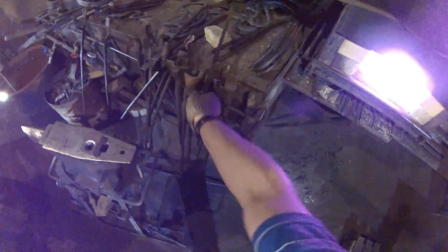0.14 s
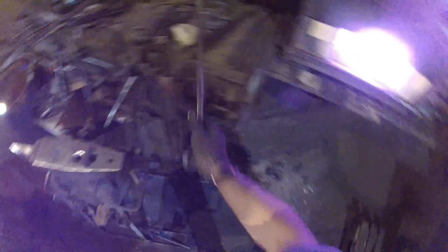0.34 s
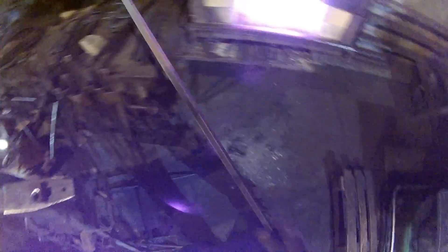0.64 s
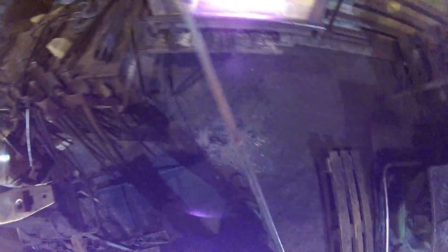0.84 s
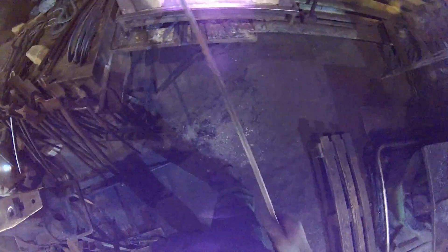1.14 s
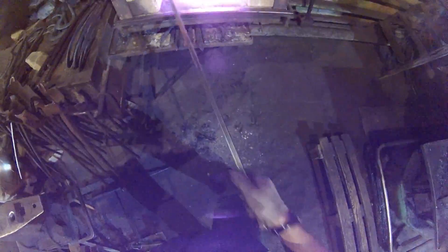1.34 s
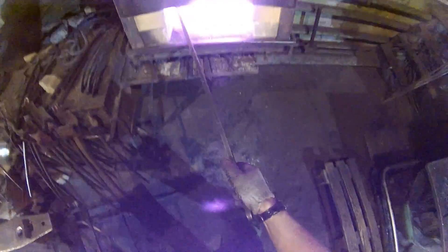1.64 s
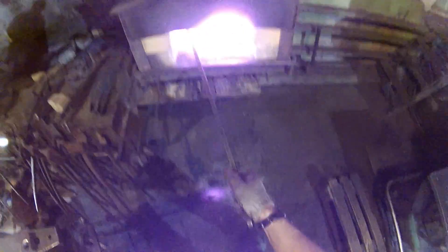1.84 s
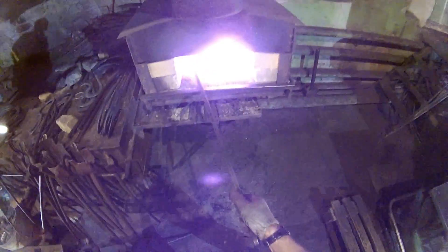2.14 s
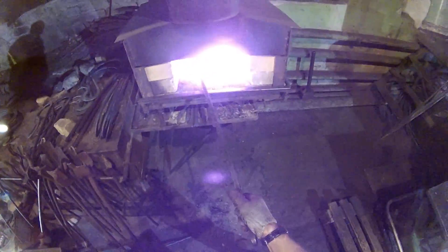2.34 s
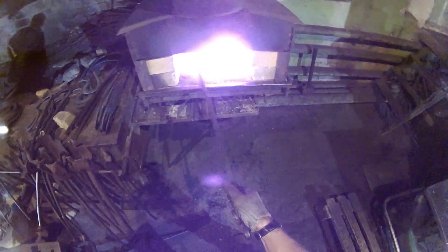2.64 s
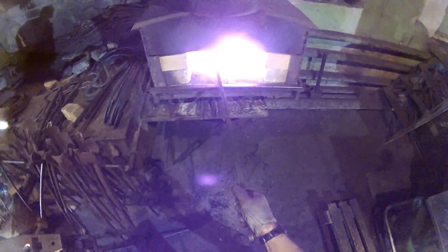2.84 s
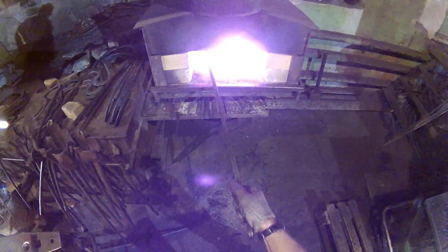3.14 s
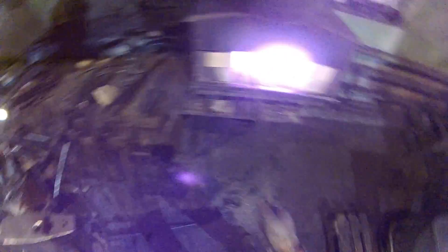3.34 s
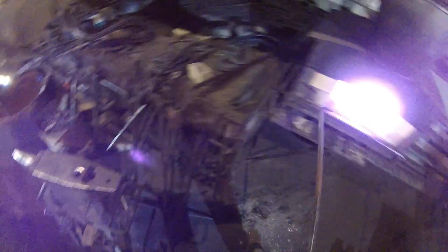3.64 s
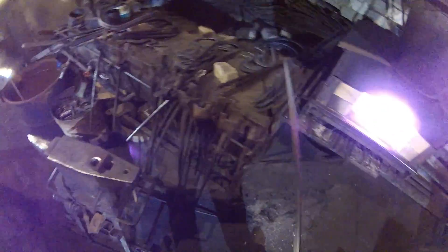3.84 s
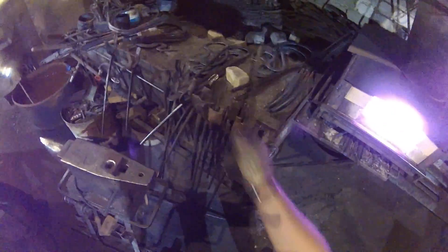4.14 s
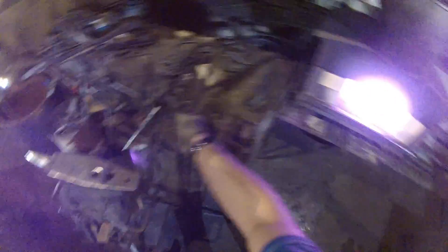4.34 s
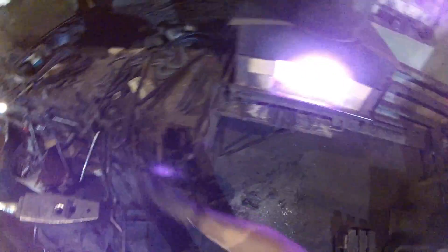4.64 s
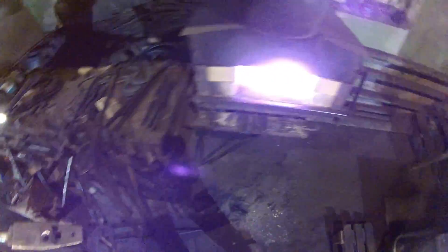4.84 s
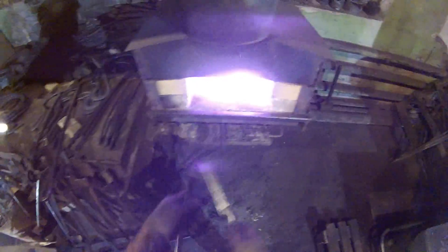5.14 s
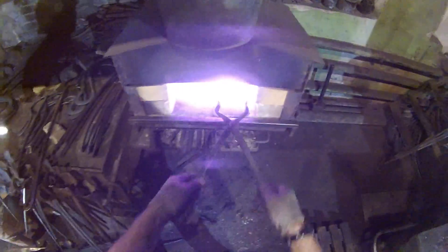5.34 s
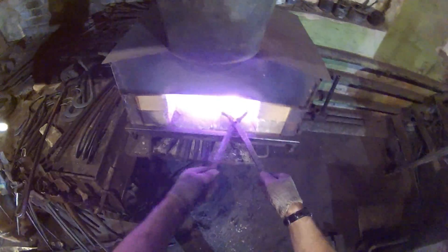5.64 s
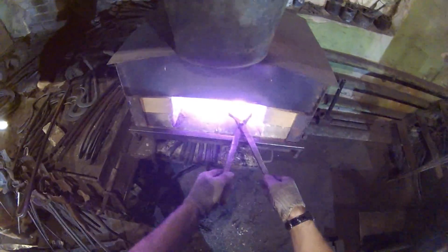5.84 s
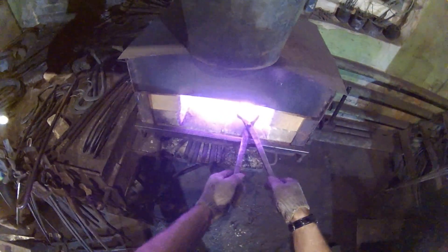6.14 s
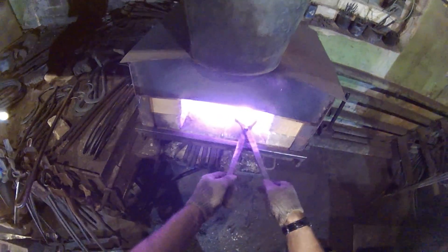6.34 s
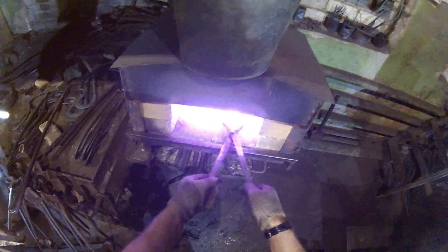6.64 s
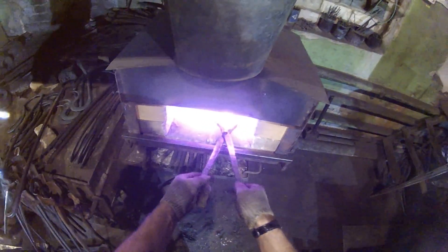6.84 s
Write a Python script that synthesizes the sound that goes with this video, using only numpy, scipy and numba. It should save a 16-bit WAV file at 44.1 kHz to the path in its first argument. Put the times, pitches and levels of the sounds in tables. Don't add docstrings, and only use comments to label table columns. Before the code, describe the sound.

Wide, airy burner hiss shifts as the wearer turns; steel nudges lightly, tongs scrape at four seconds, then soft knocks and clinks follow.

```python
import sys
import numpy as np
from scipy import signal
from scipy.fft import rfft, irfft
from scipy.io import wavfile
from scipy.ndimage import uniform_filter1d
from numba import njit

SR = 44100
rng = np.random.default_rng(int(sys.argv[2]) if len(sys.argv) > 2 else 0)


def how_loud(loudness_db):
    steps = np.asarray(loudness_db, float) / 20
    return 10 ** steps


def transcribe(u):
    v = np.clip(np.atleast_2d(u).T, -1, 1)
    q = np.round(v * 32767).astype(np.int16)
    wavfile.write(sys.argv[1], SR, q)


N = 309141
TIME = np.arange(N) / SR
FREQ = np.arange(N // 2 + 1) * SR / N + 1e-9

# [t/s, nearness/dB, facing the mouth/dB]
WEARER_MOVES = [(0, -1, -1.5), (.4, 0, -1.5), (.9, 1.5, 5), (1.35, 0, -1.5), (1.65, -2.5, -3),
                (1.9, -1.5, 1.5), (2.35, 0, 5.5), (2.9, -1, 4), (3.4, -2, 2.5), (3.85, -2, -3.5),
                (4.35, 1.5, -3), (4.6, -0.5, 0.5), (5.1, 0, 0), (5.4, 3.5, -0.5), (5.62, 2.5, 4.5),
                (5.88, 2.5, -1.5), (6.4, 0, 0), (7.01, 1, -0.5)]
# [f/Hz, share of nearness, share of facing]
HISS_SHARES = [(134, 0.24, 0), (1300, 0.77, -0.085), (1600, 0.55, -0.34), (1900, 0.48, -0.077),
               (2500, .3, 0.047), (3030, .1, 0.62), (3490, 0.28, -0.14), (4100, 0.48, 0.21),
               (4840, 0.74, -0.21), (7000, .1, 0.26), (11000, 0.55, -.15)]
# [t/s, f/Hz, level/dB]
TUBE_SONG = [(0, 3900, -17), (.5, 4200, 0), (1.5, 4080, 2.5), (2.5, 4030, -0.5), (3.5, 4210, 1.5),
             (4.5, 4110, 3), (5.2, 4066, 2), (5.8, 4060, 9.5), (6.15, 4100, 6.5), (6.45, 4160, 11),
             (7.01, 4224, 11.5)]
# [start t/s, length/s, from f/Hz, to f/Hz, level/dB]
WHISTLE_GLIDES = [
    (0, 1, 10500, 8730, 7.5),
    (1.05, 1.42, 8650, 8950, 4),
    (3.1, 0.75, 8350, 8500, 3),
    (4.852, 1.2, 9950, 8900, 5),
    (5.95, .42, 8900, 9000, 3),
    (6.55, 0.48, 8450, 8350, 6),
]
# [start t/s, length/s, f at 0 s/Hz, level/dB]
SPURT_LINES = [
    (-.05, 0.26, 10200, 14),
    (-.05, 0.26, 10640, 14),
    (-.05, .12, 10760, 14),
    (.1, .16, 10830, 17),
    (.4, .18, 10620, 9),
]
# [t/s, length/s, level/dB]
INSECT_BURSTS = [
    (1.76, .05, 13),
    (5.665, .12, 12),
    (5.79, .07, 7),
    (5.98, .05, 7),
    (6.09, .05, 14),
    (6.19, .045, 15),
    (6.27, .04, 8),
    (6.97, .04, 8),
]
# [t/s, level/dB, length/s]
STEEL_NUDGES = [(1.171, 3, 0.0155), (1.198, -3, 0.0067), (1.279, 3, 0.016), (1.356, 5, 0.016),
                (1.376, -3, 0.014), (4.115, 1.5, .012), (4.133, 0, .006), (4.155, 2, 0.017),
                (4.176, 2, .004), (4.231, -3, .006), (4.24, 6, 0.0059), (4.267, 4, .003),
                (4.328, -5, 0.014)]
# [f/Hz, level/dB]
SCRAPE_COLOUR = [(1400, -20.5), (1900, -10), (2150, 3), (2450, -8), (2700, 6.5), (3030, 2), (3250, 5),
                 (3600, -4), (4100, -7.5), (4900, -2.5), (6300, -1), (6800, 1), (7600, -3), (8500, -35)]
# [t/s, level/dB, f/Hz, t60/s]
TOOL_TICKS = [
    (1.368, 15, 4230, 0.1),
    (5.02, 17, 1800, 0.14),
    (5.745, 11, 1870, 0.12),
    (5.73, 11, 6950, .25),
    (6.13, 12, 5400, 0.35),
    (6.162, 18.5, 4100, 0.091),
]
# [f/Hz, level/dB]
CASE_WALL = [(25, -110), (70, -107), (120, -96.5), (200, -88), (300, -87.5), (450, -87.5), (700, -92.5),
             (1050, -84), (1550, -78), (2100, -70.5), (2550, -74.5), (3300, -74.5), (4500, -78), (5100, -95),
             (5500, -93.5), (5850, -104), (6500, -109), (7600, -104), (8400, -102), (8900, -98.5),
             (9800, -91.5), (11000, -91), (12500, -90.5), (13000, -100.5), (13600, -104), (14500, -111),
             (15300, -100), (15700, -101)]
# [f/Hz, width/Hz, level/dB]
CASE_PEAKS_AND_DIPS = [(208, 19, 3.5), (297, 11.3, 8), (1285, 4.9, 3.5), (1294.6, 134, 14.5), (1396.5, 137, 10.5),
                       (1627, 130, 4.5), (1802, 94, 12), (1909, 158, 8), (2300, 100, 2.5), (3035, 175, 9.5),
                       (3578, 255, -11.5), (3812, 187, 6), (4080, 200, 5.5), (5230, 93, 3), (7060, 190, -3.5),
                       (9580, 220, -7.5), (10000, 300, 0.5), (15050, 260, 5),
                       (6040, 190, -35), (7995, 80, -18), (8030, 450, -12)]


def on_log(table):
    hz, db = np.transpose(table)
    return np.interp(np.log(FREQ), np.log(hz), db)


def shaped(x, gain):
    return irfft(rfft(x) * gain, N)


@njit
def svf(x, hz, width):
    y, band, low = np.empty(len(x)), 0., 0.
    for i in range(len(x)):
        g = np.tan(np.pi * hz[i] / SR)
        damping = width[i] / hz[i]
        v = (band + g * (x[i] - low)) / (1 + g * (g + damping))
        band = 2 * v - band
        low = low + 2 * g * v
        y[i] = damping * v
    return y


def resonance(x, hz, width):
    return svf(x, np.zeros(N) + hz, np.full(N, 1. * width))


def walk(rate):
    hold = int(SR / rate)
    levels = np.repeat(rng.standard_normal(N // hold + 1), hold)
    return 0.96 * uniform_filter1d(uniform_filter1d(levels, hold), hold)[:N]


def gate(s, span, edge):
    return np.clip(np.minimum(TIME - s, s + span - TIME) / edge, 0, 1)


def burner(swell_db=1.16, flicker_db=0.38, treble_flicker_db=2.5, drift_db=0.8):
    s, *moves = np.transpose(WEARER_MOVES)
    turn = np.array([np.interp(TIME, s, db) for db in moves])
    part_hz, *shares = np.transpose(HISS_SHARES)
    noise = rfft(rng.standard_normal(N))
    swell = swell_db * walk(6)
    gust = walk(24)
    low_hz = 134 * 2 ** (np.arange(9) / 3)
    middle_hz = 134 * 2 ** (np.arange(18, 30) / 6)
    centres = np.r_[low_hz, middle_hz, 4300:16000:580]
    position = np.interp(FREQ, centres, np.arange(len(centres)))
    out = 0
    for k, hz in enumerate(centres):
        share = [np.interp(np.log(hz), np.log(part_hz), row) for row in shares]
        if hz > 6000:
            flicker = treble_flicker_db * (0.54 * walk(11) + 0.37 * gust)
        else:
            flicker = flicker_db * walk(8) + drift_db * walk(2.99)
        band = irfft(noise * np.clip(1 - abs(position - k), 0, 1), N)
        out = out + how_loud(share @ turn + swell + flicker) * band
    return out


def shop(x, echo_db=-15.5, echo_s=0.008, drift_s=0.000594, bass_hz=1470):
    lags = echo_s * (0.1483 + rng.random(8))
    wet = sum(np.interp(TIME - lag - drift_s * walk(1), TIME, x) for lag in lags)
    return x + how_loud(echo_db) * shaped(wet, 1 / (1 + (bass_hz / FREQ) ** 2))


def tube(width_hz=60):
    s, *columns = np.transpose(TUBE_SONG)
    hz, db = (np.interp(TIME, s, column) for column in columns)
    return how_loud(db + 2.0 * walk(6.06)) * resonance(rng.standard_normal(N), hz, width_hz)


def mouth(pitch_hz=3028, width_hz=95, level_db=-1, facing_share=1.72):
    s, _, facing_db = np.transpose(WEARER_MOVES)
    db = level_db + facing_share * np.interp(TIME, s, facing_db) + 1.5 * walk(6)
    hz = pitch_hz * (1 + 0.0056 * walk(3))
    return how_loud(db) * resonance(rng.standard_normal(N), hz, width_hz)


def whistle_line(hz, width_hz, gain):
    once = resonance(rng.standard_normal(N), hz, width_hz)
    return gain * how_loud(2.0 * walk(15)) * resonance(once, hz, width_hz)


def whistle(wide_hz=600, thin_hz=70, edge_s=0.1, line_edge_s=0.03, sag_hz_per_s=1960):
    s, span, from_hz, to_hz, _ = np.transpose(WHISTLE_GLIDES)
    hz = np.interp(TIME, np.c_[s, s + span].ravel(), np.c_[from_hz, to_hz].ravel())
    band = sum(how_loud(db) * gate(s - edge_s, span + edge_s, edge_s) for s, span, _, _, db in WHISTLE_GLIDES)
    spurt_db = 8 * np.exp(-TIME / 0.25)
    out = whistle_line(hz, wide_hz, band * how_loud(spurt_db))
    sag = sag_hz_per_s * np.minimum(TIME, 1)
    for s, span, start_hz, db in SPURT_LINES:
        out = out + whistle_line(start_hz - sag, thin_hz, how_loud(db) * gate(s, span, line_edge_s))
    return out


def insect(pitch_hz=15150, width_hz=500, throb_hz=90, chatter_db=-2, patchy_db=5):
    bursts = sum(how_loud(db) * gate(s, span, 0.01) for s, span, db in INSECT_BURSTS)
    chatter = how_loud(chatter_db + patchy_db * walk(22))
    throb = 0.65 + 0.4 * np.sin(2 * np.pi * throb_hz * TIME)
    return resonance((bursts + chatter) * throb * rng.standard_normal(N), pitch_hz, width_hz)


def scrape(grain_db=3.0, slip_db=0.5, nudge_edge_s=0.0022):
    grain = np.minimum(rng.exponential(size=N), 5.0)
    slips = rng.standard_normal(N) * how_loud(grain_db * grain)
    slips = shaped(slips / np.std(slips), how_loud(on_log(SCRAPE_COLOUR)))
    nudges = sum(how_loud(db) * gate(s, span, nudge_edge_s) for s, db, span in STEEL_NUDGES)
    drag_age = TIME - 4.109
    attack = np.clip(drag_age / 0.003, 0, 1)
    release_db = 110 * np.maximum(drag_age - 0.16, 0)
    drag = attack * how_loud(6 - release_db + slip_db * walk(260))
    return slips * (drag + nudges)


def ticks(attack_s=0.0052):
    out = 0
    for s, db, hz, t60 in TOOL_TICKS:
        age = np.maximum(TIME - s, 0)
        envelope = np.minimum(age / attack_s, 1) * how_loud(db - 60 * age / t60)
        blow = envelope * rng.standard_normal(N)
        out = out + resonance(resonance(blow, hz, 0.12 * hz), hz, 0.12 * hz)
    return out


def scene():
    echoing = shop(burner() + scrape())
    return (echoing + tube() + mouth() + whistle() + insect() + ticks())[None]


def roll_off(x):
    return signal.sosfilt(signal.butter(12, 15740, fs=SR, output="sos"), x)


def record(dry):
    db = on_log(CASE_WALL) + 30
    for hz, width, peak_db in CASE_PEAKS_AND_DIPS:
        db = db + peak_db / (1 + (2 * (FREQ - hz) / width) ** 2)
    cepstrum = irfft(np.log(how_loud(db)), N)
    cepstrum[1:N // 2 + 1] *= 2
    cepstrum[N // 2 + 1:] = 0
    mix = shaped(dry[0], np.exp(rfft(cepstrum)))[None]
    return roll_off(mix)


dry = scene()
out = record(dry)
transcribe(out)
```